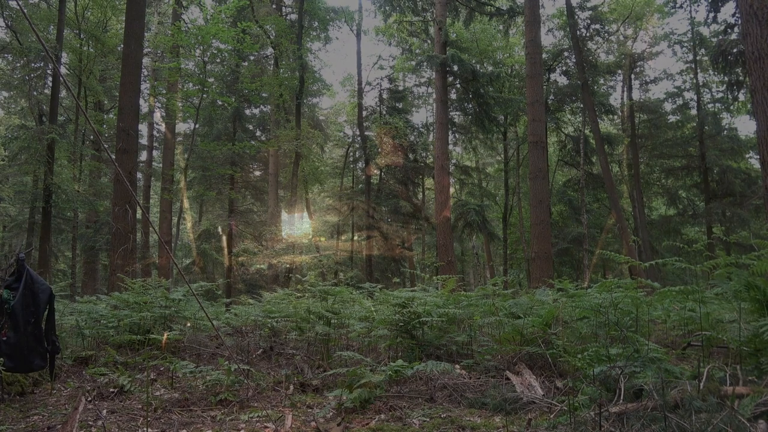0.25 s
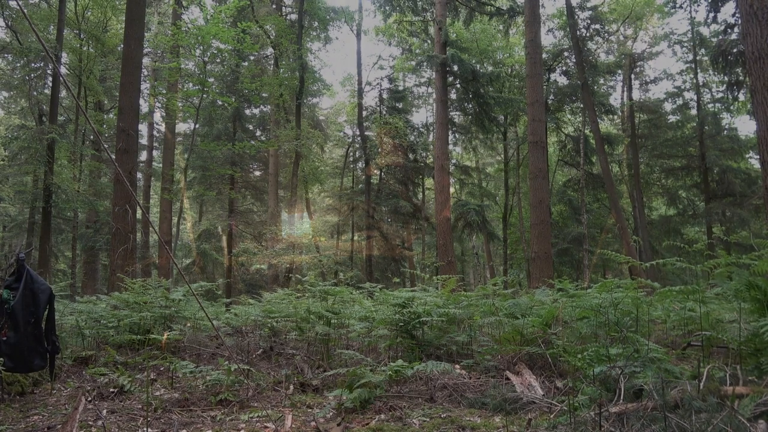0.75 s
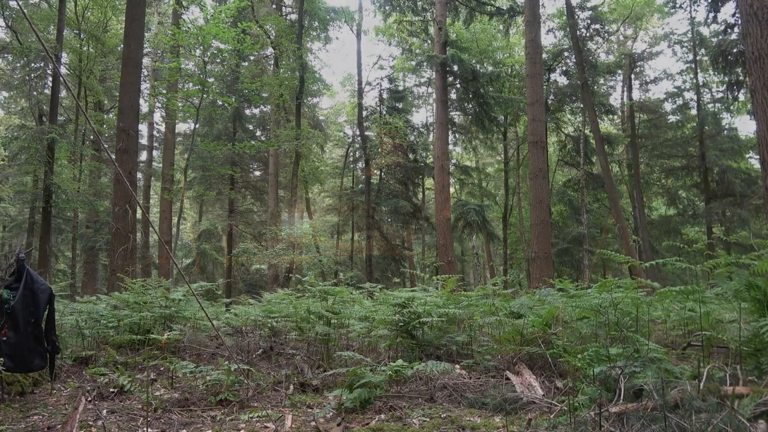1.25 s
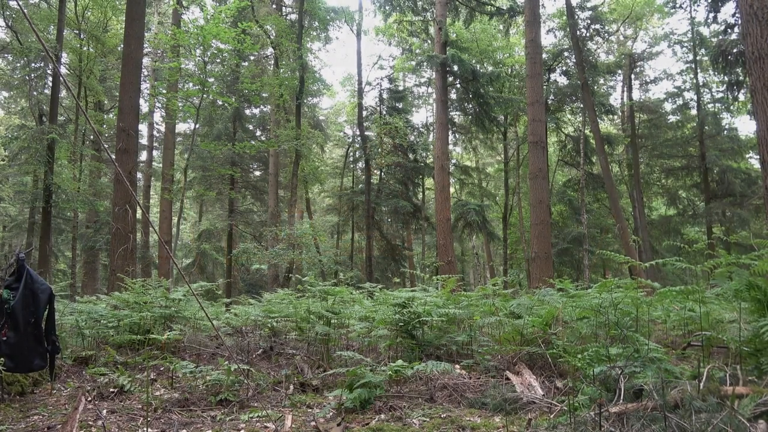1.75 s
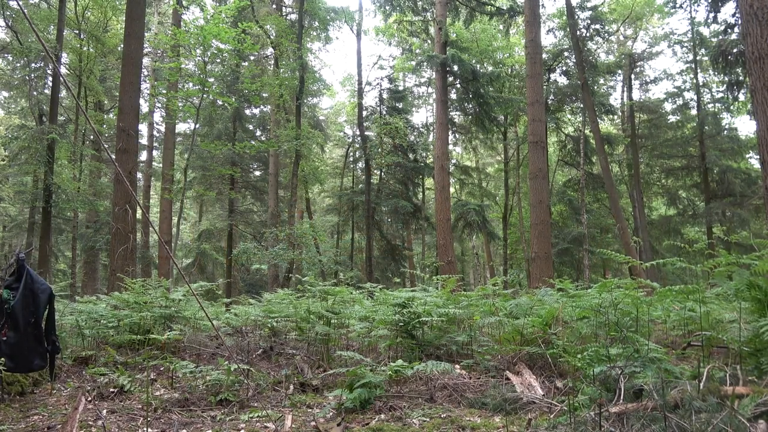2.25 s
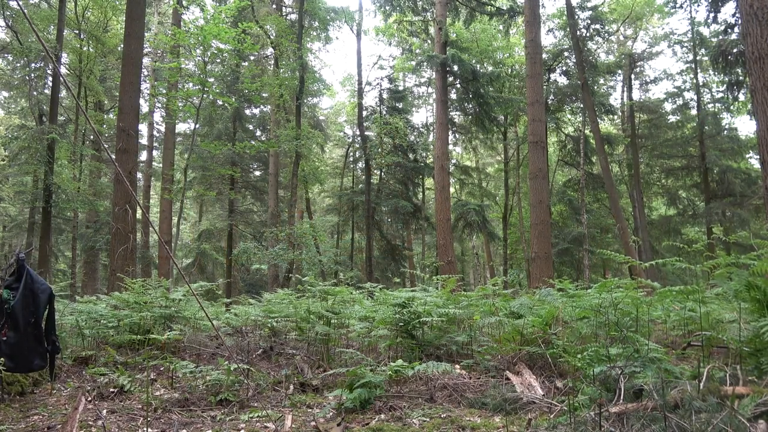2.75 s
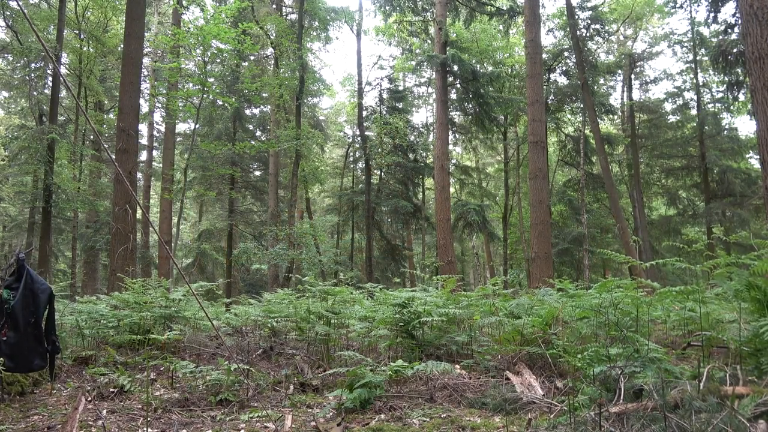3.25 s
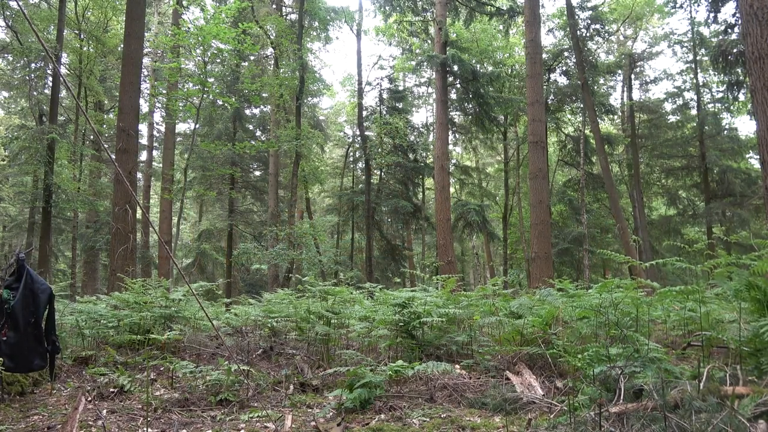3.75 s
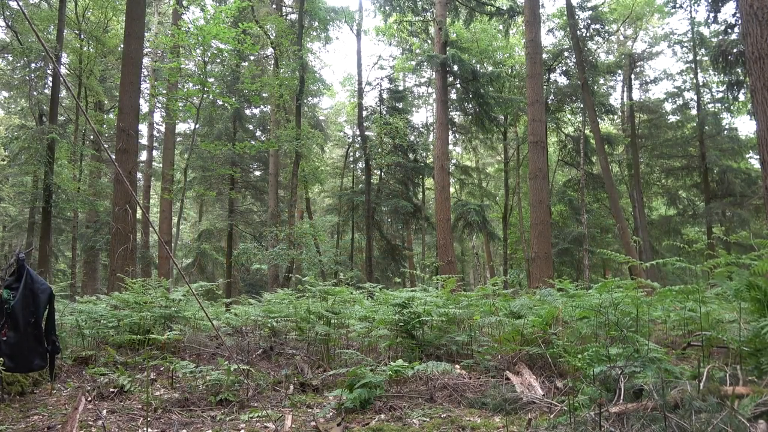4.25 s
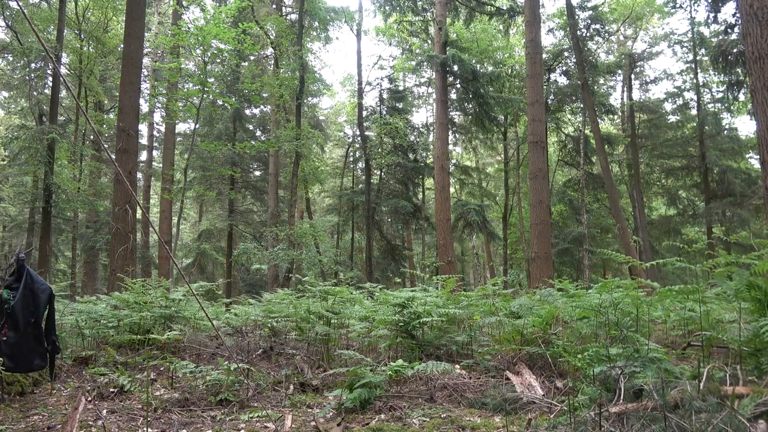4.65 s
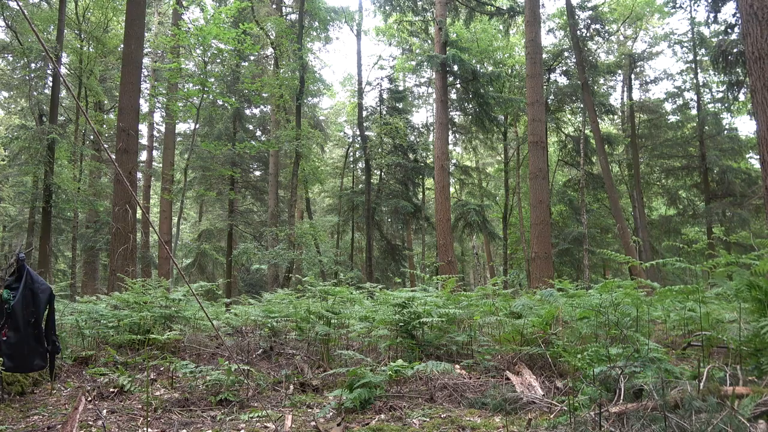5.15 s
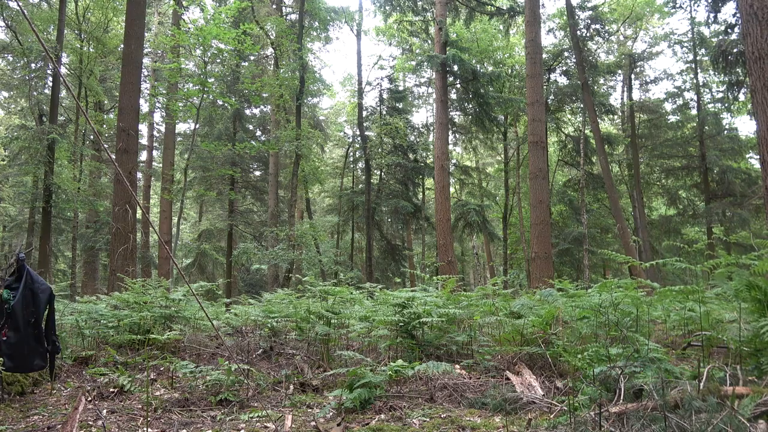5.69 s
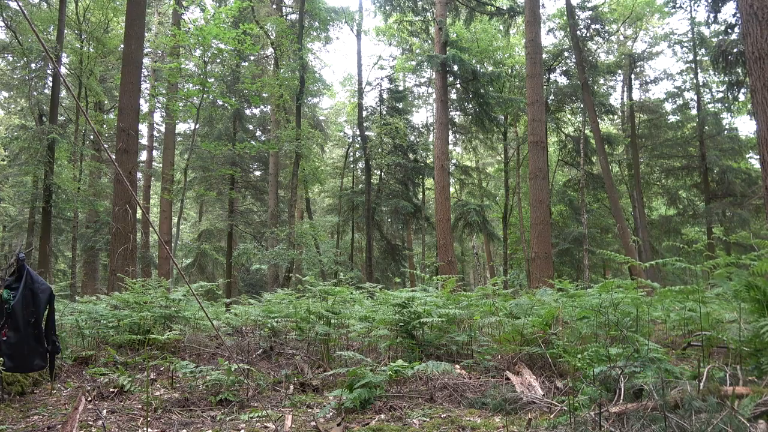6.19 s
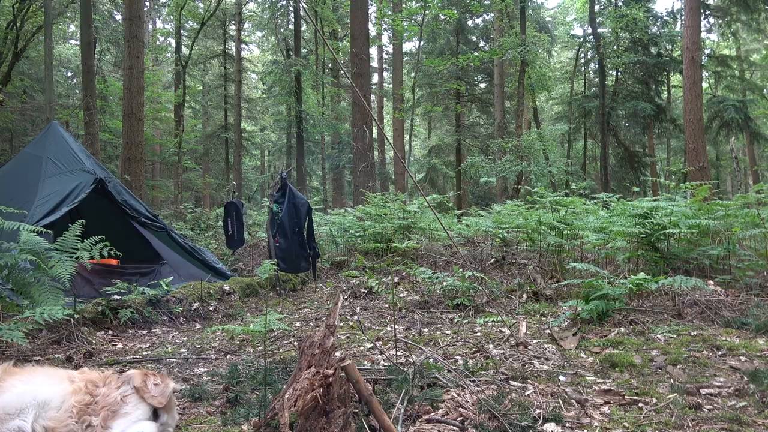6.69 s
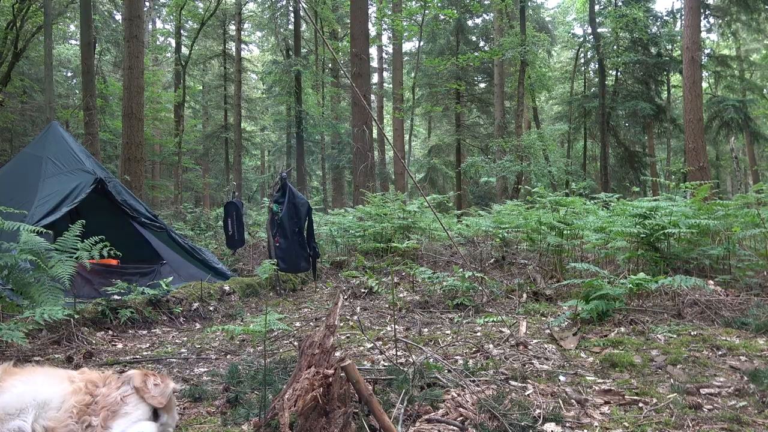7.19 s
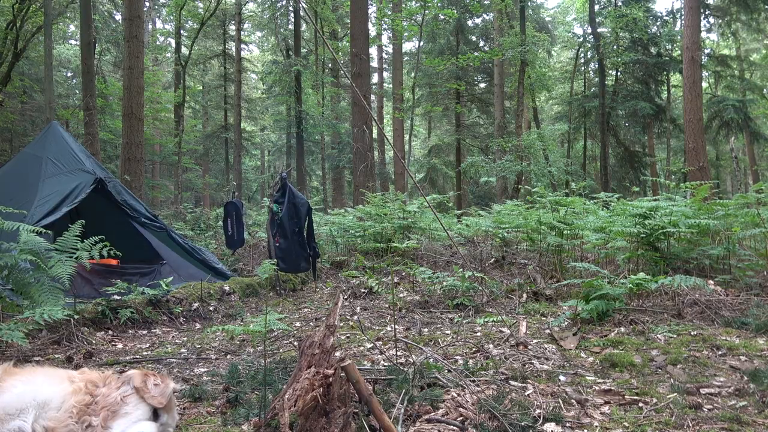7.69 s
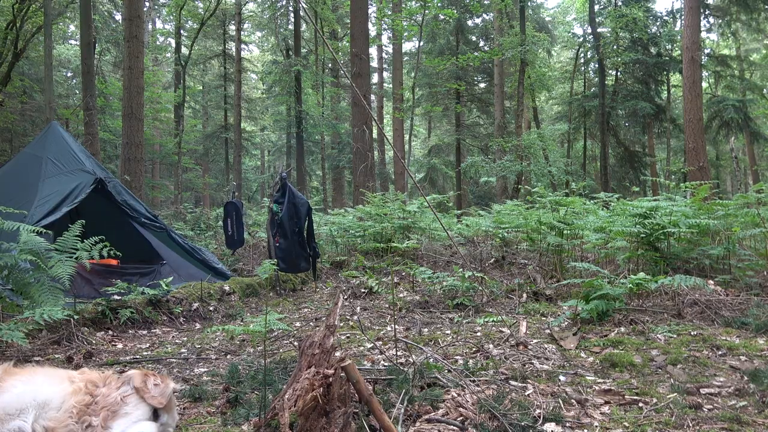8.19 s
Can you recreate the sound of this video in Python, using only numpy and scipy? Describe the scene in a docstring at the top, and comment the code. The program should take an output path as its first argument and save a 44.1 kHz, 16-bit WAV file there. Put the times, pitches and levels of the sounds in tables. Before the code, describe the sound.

A quiet forest fades in with a soft, distant rush of air. A cuckoo repeats its hollow two-note call from far away, thrown back by the trunks, while a small bird gives thin rising whistles. Small falling bits land nearby with sharp ticks and brief leaf rustles, one snapping louder against a branch. Faint chirps gather later, and a closer bird sings a quick, high phrase at the end.

```python
"""A distant cuckoo calls six times in a conifer wood: two hollow, nearly pure notes a call,
thrown back by the trunks. A small bird repeats a scooped whistle, others twitter farther off,
and a nearer one breaks into song near the end; each voice is a gliding, slightly unsteady sine.
Falling bits tick on the litter nearby with a snap, a thud and a rustle of dry leaves.
Under it all lies a soft far-off rush of noise that swells late on; the sound fades in at the start."""
import sys
import numpy as np
from scipy import signal
from scipy.fft import rfft, irfft
from scipy.io import wavfile
from scipy.ndimage import uniform_filter1d

SR = 44100
rng = np.random.default_rng(int(sys.argv[2]) if len(sys.argv) > 2 else 0)


def dump(signal):
    """Clip the signal to [-1, 1] and save it as 16-bit WAV at the path in sys.argv[1]."""
    limited = np.clip(np.atleast_2d(signal).T, -1, 1)
    pcm = np.round(limited * 32767).astype(np.int16)
    wavfile.write(sys.argv[1], SR, pcm)


N = 371763

# tone colour of the background bed: (frequency [Hz], relative level [dB])
BED_COLOUR = [(12, -43), (20, -3), (130, -1), (162, -5), (308, -7), (355, -5), (419, -5.5), (539, -2),
              (733, -3), (1180, -1), (1690, -9), (2570, -13.5), (3400, -18.5), (14100, -16), (15800, -17.5)]
# stereo width of the bed: (frequency [Hz], left-right likeness [0-1])
BED_LIKENESS = [(25, 0.036), (60, 1), (250, 0.73), (1000, 0.98), (2000, 0.8), (4000, 0), (8000, 0.26),
                (15000, 0)]
# stereo skew of the bed: (frequency [Hz], phase lead of the left side [rad])
BED_PHASE = [(0, 1), (2150, -0.31), (9220, 2), (15000, 5.5), (16300, 7)]
# one brief bulge in the rumble: (time [s], half width [s], boost [dB])
RUMBLE_BULGE = (7.15, 0.068, 3.5)
# level ride of the chatter deep in the wood: (time [s], level [dB])
CHATTER_RIDE = [(.6, -76.5), (1.1, -96), (5.1, -85), (5.9, -75), (7.4, -80), (7.65, -72), (8.43, -71)]
# far birds' held notes: (time [s], length [s], pitch [Hz], level [dB])
HELD_NOTES = [(0.062, .055, 3820, -68), (0.159, .056, 3580, -64.5), (.29, 0.11, 3450, -69),
              (.665, 0.052, 4420, -68), (6.271, 0.19, 4266, -61), (7.043, 0.15, 4120, -66),
              (7.075, .25, 4500, -62.5)]
# far birds' rising chips: (time [s], middle pitch [Hz], level [dB])
RISING_CHIPS = [(5.67, 3680, -67), (5.82, 2890, -61), (5.86, 3820, -62.5), (6.015, 2880, -63),
                (6.055, 3790, -69), (7.515, 3260, -59), (7.675, 3360, -57.5), (8.14, 3100, -58)]
# thin peeps: (time [s], top pitch [Hz], level [dB])
THIN_PEEPS = [(.372, 8250, -61.5), (1.128, 8450, -66)]
# high note of each cuckoo call: (time [s], length [s], pitch [Hz], level [dB], catch in the voice [0-1])
CUCKOO_CALLS = [(.426, .078, 717, -40.2, .3), (1.776, .088, 716, -41, .25), (3.192, .081, 710, -38.8, .1),
                (4.449, .091, 721, -41, 1), (5.741, .082, 713, -39.2, .1), (7.088, .08, 720, -39, .45)]
# contours of the high and the low note: (position in note [0-1], pitch [ratio], level [dB])
HIGH_CONTOUR = [(0, .91, -17), (.17, .965, -4.5), (.34, .99, -1), (.6, 1.003, 0), (.85, .99, .5),
                (1, .96, -9)]
LOW_CONTOUR = [(0, .985, -19), (.11, .992, -4), (.28, .995, -.5), (.58, 1, 0), (.82, 1.009, -1.5),
               (1, .99, -18)]
# a catching voice overshoots, falters and pushes on lower:
# (position in note [0-1], pitch change [fraction], level [dB])
VOICE_CATCH = [(0, 0, 0), (.4, .01, -1), (.62, .05, -4), (.72, -.01, -5), (.83, -.025, 4), (1, 0, 2)]
# slapback of the cuckoo from stands of trees: (delay [s], level [dB])
TREE_ECHOES = [(.085, -12.5), (.2, -15.5)]
# larger bits hitting the litter: (time [s], level [dB], ring [Hz], relative thud level [dB])
FALLING_BITS = [(.4979, -35.5, 8900, 0.5), (1.269, -35.5, 9500, -8.5), (1.5634, -35, 10700, -7),
                (1.8805, -42, 9500, -11), (2.9483, -32.5, 7800, -25), (3.0802, -25.5, 6330, -25),
                (3.166, -42.5, 7500, -10), (5.119, -40, 10050, -26), (6.387, -39, 7500, -11),
                (7.011, -36.5, 9900, -17)]
# a twig striking a dead branch: (time [s], level [dB])
BRANCH_HIT = (3.0803, -39)
# modes of that branch: (frequency [Hz], level [dB], time to fall 60 dB [s])
BRANCH_MODES = [(646, 0, .05), (860, -7, .035), (1310, -6, .025), (1640, -5, .025)]
# scooped whistles: (time [s], length [s], dip pitch [Hz], held pitch [Hz], level [dB])
WHISTLE_NOTES = [(1.083, 0.21, 3650, 4680, -56.5), (1.518, 0.21, 3510, 4686, -51.5),
                 (2.668, .198, 3510, 4620, -52.5), (6.483, 0.21, 3460, 4530, -54.5)]
# contour of a whistle: (position in note [0-1], scoop depth [fraction], level [dB])
SCOOP_CONTOUR = [(0, -0.59, -7), (.08, .45, -7), (.17, 1.03, -11), (.27, .52, -4.5), (.39, .17, -0.5),
                 (.55, .04, 3), (.75, 0, -2), (1, .01, -3)]
# the nearer song: (time [s], length [s], start pitch [Hz], goal pitch [Hz], level [dB], quiver [fraction])
SONG_NOTES = [(7.696, .098, 3940, 4447, -44.5, 0.023), (7.833, 0.083, 7270, 7370, -58.5, .009),
              (7.873, 0.047, 6200, 5450, -47, 0.039), (7.901, 0.104, 4060, 3753, -42.5, 0.01),
              (8.065, 0.045, 4550, 4570, -49, .013), (8.07, 0.086, 3850, 3980, -48, .021),
              (8.153, 0.098, 4025, 4220, -47.5, 0.037), (8.265, 0.033, 7950, 8280, -54, .022),
              (8.319, .08, 7850, 5750, -47.5, 0.013)]


def gain_of(db):
    """Decibels to amplitude."""
    return 10 ** (np.asarray(db) / 20)


def unit_rms(x):
    """Scales to rms 1."""
    return x / np.sqrt(np.mean(x ** 2) + 1e-20)


def curve_at(points, hz):
    """Reads a curve on a log-frequency axis."""
    f, value = np.transpose(points)
    return np.interp(np.log(hz + 1), np.log(f + 1), value)


def add(mix, start_s, sound):
    """Drops a sound into the mix at its cue."""
    part = mix[..., max(round(start_s * SR), 0):][..., :sound.shape[-1]]
    part += sound[..., :part.shape[-1]]


def band(x, lo_hz, hi_hz):
    """A gentle band-pass."""
    sos = signal.butter(2, [lo_hz, min(hi_hz, SR / 2 - 1)], "band", fs=SR, output="sos")
    return signal.sosfilt(sos, x)


def wander(size, hz):
    """Random drift of rms about 1, moving at rates up to about hz."""
    n = max(size, SR)
    rolloff = 1 + (np.fft.rfftfreq(n, 1 / SR) / hz) ** 4
    return unit_rms(irfft(rfft(rng.standard_normal(n)) / rolloff, n))[:size]


def syrinx(hz, db, quiver, quiver_hz, edge_s):
    """A bird's nearly pure tone, with a slightly unsteady pitch and rounded ends."""
    phase = 2 * np.pi * np.cumsum(hz * (1 + quiver * wander(len(hz), quiver_hz))) / SR
    edges = signal.windows.tukey(len(hz), 2 * edge_s * SR / len(hz))
    return np.sqrt(2) * gain_of(db) * np.sin(phase) * edges


def sing(notes):
    """A dry track of small birds' notes: (time [s], pitch curve [Hz], level [dB], quiver [fraction])."""
    voice = np.zeros(N)
    for s, hz, db, quiver in notes:
        add(voice, s, syrinx(hz, db, quiver, quiver_hz=256, edge_s=.0023))
    return voice


def stretch(contour, length_s):
    """Stretches the columns of a contour over a note's length."""
    position, *columns = np.transpose(contour)
    return [np.interp(np.linspace(0, 1, int(length_s * SR)), position, c) for c in columns]


def wood(x, wet_db, t60, likeness, lag_ms, build_s):
    """Forest reverb: the direct sound is lag_ms late on the left; trunk scatter builds and dies away."""
    t = np.arange(int(1.5 * SR)) / SR
    taps = rng.choice([-1., 1.], (2, len(t))) * (rng.random((2, len(t))) < 2000 / SR)  # 2000 a second
    taps *= gain_of(-60 * t / t60) * (1 - np.exp(-t / build_s))
    mid, side = taps / np.linalg.norm(taps, axis=1, keepdims=True)
    tail = np.sqrt((1 + likeness) / 2) * mid + np.sqrt((1 - likeness) / 2) * np.array([side, -side])
    khz = np.fft.rfftfreq(N, 1000 / SR)
    left = irfft(rfft(x) * np.exp(-2j * np.pi * khz * lag_ms), N)
    return np.array([left, x]) + gain_of(wet_db) * signal.fftconvolve(x[None], tail, axes=1)[:, :N]


def air_bed(swell_from_s=4.69, rumble_db_per_s=.5, rush_db_per_s=1.14):
    """Low rumble, the far rush through the trees and a fine hiss; the first two swell together."""
    hz, t = np.fft.rfftfreq(N, 1 / SR), np.arange(N) / SR
    mid, side = rfft(rng.standard_normal((2, N)))
    likeness = curve_at(BED_LIKENESS, hz)
    side *= np.sqrt((1 - likeness) / (1 + likeness))
    stereo = np.array([(mid + side) * np.exp(1j * curve_at(BED_PHASE, hz)), mid - side])
    colour = gain_of(curve_at(BED_COLOUR, hz))
    lows = 1 / (1 + (hz / 300) ** 4)
    highs = 1 / (1 + (6500 / (hz + 1)) ** 4)

    def layer(share, db, lo_hz, hi_hz, waver_db):
        """One wavering slice of the noise, its level set between lo_hz and hi_hz."""
        band_rms = np.sqrt(2) * np.linalg.norm((mid * colour)[(hz > lo_hz) & (hz < hi_hz)]) / N
        noise = irfft(stereo * colour * share, N) / band_rms
        return noise * gain_of(db + waver_db * wander(N, hz=7.1))

    swelling_s = np.maximum(t - swell_from_s, 0)
    bulge_s, width_s, bulge_db = RUMBLE_BULGE
    bulge = np.exp(-((t - bulge_s) / width_s) ** 2)
    rumble = layer(lows, -61.5 + rumble_db_per_s * swelling_s + bulge_db * bulge, 30, 250, waver_db=.7)
    rush = layer(1 - lows - highs, -55.5 + rush_db_per_s * swelling_s, 850, 2500, waver_db=.5)
    hiss = layer(highs, -67.5, 9000, 15000, waver_db=.5)
    return rumble + rush + hiss


def chatter(count=340):
    """A wash of short random glides from birds too far off to be told apart."""
    notes = []
    for when, span, pitch, glide, softness in rng.random((count, 5)):
        hz, slope = 2800 + 1900 * pitch, .235 * (glide - .4)
        ramp = np.linspace(-1, 1, int((.0203 + .0414 * span) * SR))
        notes.append((when * N / SR, hz * (1 + slope * ramp), -7 * softness, .024))
    ride_db = np.interp(np.arange(N) / SR, *np.transpose(CHATTER_RIDE))
    voices = unit_rms(sing(notes)) * gain_of(ride_db)
    return wood(voices, wet_db=11, t60=.8, likeness=.3, lag_ms=0, build_s=.004)


def far_birds(chip_s=.0289, chip_octaves_per_s=9):
    """Held notes and quick rising chips, heard mostly by way of the trees."""
    held = sing((s, np.full(int(length * SR), hz), db, .017) for s, length, hz, db in HELD_NOTES)
    rise = 2 ** (chip_octaves_per_s * np.arange(-chip_s / 2, chip_s / 2, 1 / SR))
    chips = sing((s, hz * rise, db, .016) for s, hz, db in RISING_CHIPS)
    return wood(held + chips, wet_db=3, t60=1, likeness=.43, lag_ms=.01, build_s=.0033)


def peeps(length_s=.043, droop=.05):
    """Thin, high notes that arch in pitch, drooping at both ends."""
    arch = 1 - droop * np.linspace(-1, 1, int(length_s * SR)) ** 2
    voice = sing((s, hz * arch, db, .004) for s, hz, db in THIN_PEEPS)
    return wood(voice, wet_db=-5, t60=.5, likeness=.3, lag_ms=.02, build_s=.004)


def cuckoo(low_after_s=.371, low_longer_s=.117, low_hz=541, low_db=-42.5):
    """Two hollow notes a call: a short arched one, then a long level one a fourth lower."""
    high, low = np.zeros((2, N))
    for s, length, hz, db, catch in CUCKOO_CALLS:
        bend, swell_db = stretch(HIGH_CONTOUR, length)
        slip, falter_db = stretch(VOICE_CATCH, length)
        pitch = hz * (bend + catch * slip)
        level_db = db + swell_db + catch * falter_db
        add(high, s, syrinx(pitch, level_db, quiver=.008, quiver_hz=60, edge_s=.0032))
        bend, swell_db = stretch(LOW_CONTOUR, length + low_longer_s)
        coo = syrinx(low_hz * bend, low_db + swell_db, quiver=.002, quiver_hz=60, edge_s=.0032)
        add(low, s + low_after_s, coo)
    reflected = high + gain_of(-9) * low  # trunks reflect the shorter wave better
    echo = np.zeros(N)
    for delay, db in TREE_ECHOES:
        add(echo, delay, gain_of(db) * reflected)
    return (wood(high + echo, wet_db=-11, t60=2.7, likeness=.89, lag_ms=.01, build_s=.01)
            + wood(low, wet_db=-17, t60=1.4, likeness=.9, lag_ms=.01, build_s=.08))


def crumbs(count=9, db=-45.5, ring_hz=10600, spread_octaves=.56, thud_db=-10):
    """Cues for faint falls at random moments, laid out like FALLING_BITS."""
    return [(when * N / SR, db + 6 * (size - .5), ring_hz * 2 ** (spread_octaves * (pitch - .5)), thud_db)
            for when, size, pitch in rng.random((count, 3))]


def litter():
    """A bit lands with a bright snap and a duller thud, then rustles the dry leaves for a moment."""
    out, t = np.zeros((2, N)), np.arange(SR // 5) / SR
    rustle_decay = gain_of(-18) * np.exp(-t / .011) + gain_of(-29) * np.exp(-t / .045)
    for s, db, ring_hz, thud_db in list(FALLING_BITS) + crumbs():
        noise = rng.standard_normal((4, len(t)))
        snap = 1.5 * np.sin(2 * np.pi * ring_hz * t) * np.exp(-t / .00036)
        splinter = .4 * unit_rms(band(noise[0], .65 * ring_hz, 1.5 * ring_hz)) * np.exp(-t / .0012)
        thud = unit_rms(band(noise[1], 590, 8900)) * np.exp(-t / .0022)
        rustle = unit_rms(band(noise[2:], 3700, 6800)) * rustle_decay
        add(out, s, gain_of(db) * (snap + splinter + gain_of(thud_db) * thud + rustle))
    # the heaviest bit also sets a dead branch ringing
    hit_s, hit_db = BRANCH_HIT
    ringing = sum(gain_of(db - 60 * t / t60) * np.sin(2 * np.pi * hz * t) for hz, db, t60 in BRANCH_MODES)
    add(out, hit_s, gain_of(hit_db) * band(ringing, 550, 3000))
    return out * gain_of([[-.8], [.8]])  # panned a touch right


def whistler():
    """Each whistle drops in from above, scoops up and holds its top."""
    voice = np.zeros(N)
    for s, length, dip_hz, held_hz, db in WHISTLE_NOTES:
        depth, swell_db = stretch(SCOOP_CONTOUR, length)
        hz = uniform_filter1d(held_hz + (dip_hz - held_hz) * depth, size=400)  # rounds the corners
        add(voice, s, syrinx(hz, db + swell_db, quiver=.0038, quiver_hz=120, edge_s=.004))
    return wood(voice, wet_db=-6.5, t60=1.25, likeness=.4, lag_ms=.02, build_s=.004)


def near_song(octaves_per_s=6, attack_s=.022, attack_from_db=-7):
    """A nearer bird's burst of song: each note swells in, slides toward its goal and holds once there."""
    notes = []
    for s, length, start_hz, goal_hz, db, quiver in SONG_NOTES:
        t = np.arange(int(length * SR)) / SR
        reach = octaves_per_s * t
        hz = start_hz * 2 ** np.clip(np.log2(goal_hz / start_hz), -reach, reach)
        swell_db = attack_from_db * np.maximum(1 - t / attack_s, 0)
        notes.append((s, hz, db + swell_db, quiver))
    return wood(sing(notes), wet_db=-1, t60=.9, likeness=.35, lag_ms=-.04, build_s=.005)


def scene():
    """The full mix: birds and falling bits over the bed of air."""
    birds = cuckoo() + whistler() + far_birds() + peeps() + near_song() + chatter()
    return birds + litter() + air_bed()


def record(dry):
    """The fade-in, then the recorder's band limit."""
    fade_s, fade_from_db, cutoff_hz = 1.95, -6.5, 15900
    fade = gain_of(fade_from_db * np.maximum(1 - np.arange(N) / SR / fade_s, 0))
    lowpass = signal.firwin(511, cutoff_hz, window=("kaiser", 9), fs=SR)
    return signal.oaconvolve(dry * fade, lowpass[None], "same")


dry = scene()
out = record(dry)
dump(out)
```